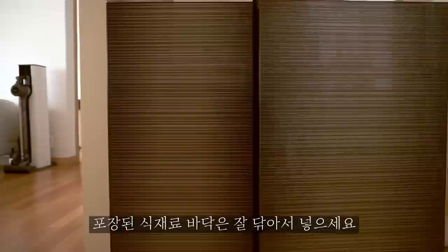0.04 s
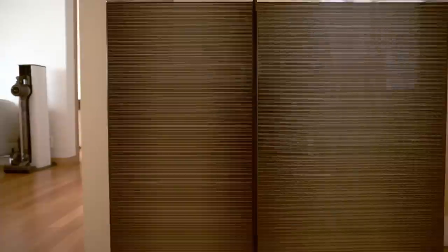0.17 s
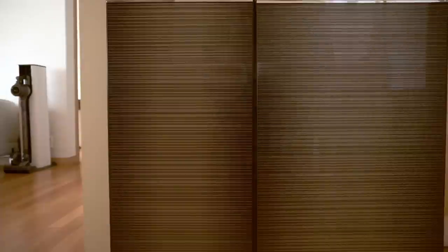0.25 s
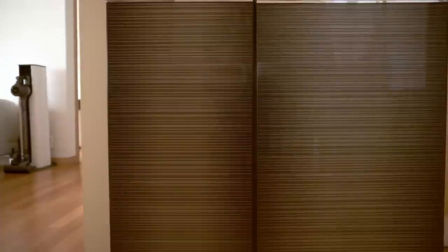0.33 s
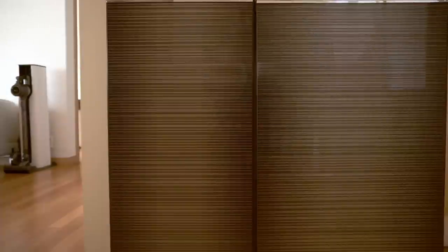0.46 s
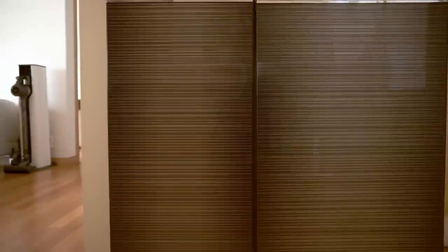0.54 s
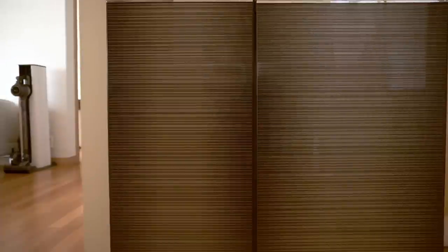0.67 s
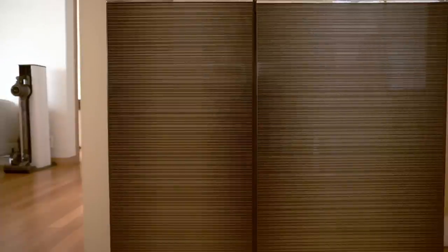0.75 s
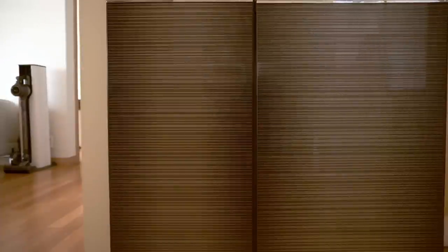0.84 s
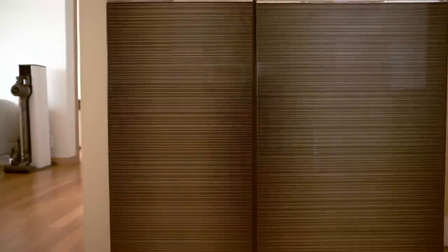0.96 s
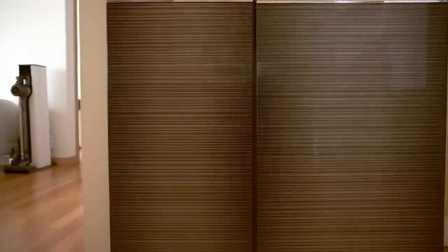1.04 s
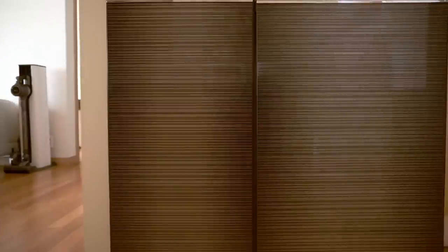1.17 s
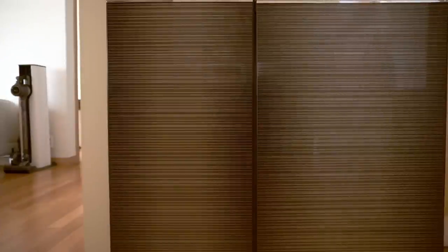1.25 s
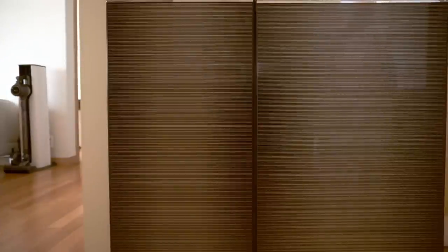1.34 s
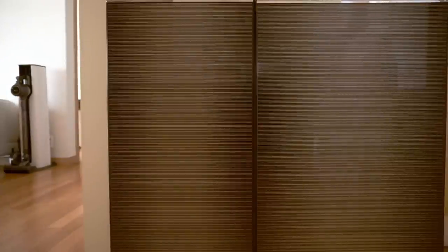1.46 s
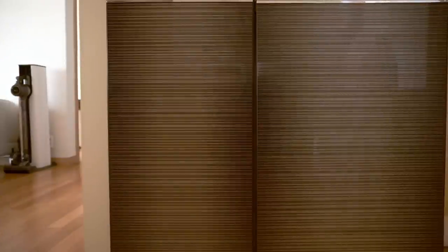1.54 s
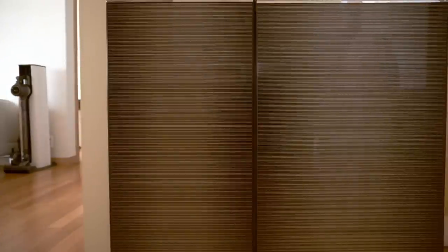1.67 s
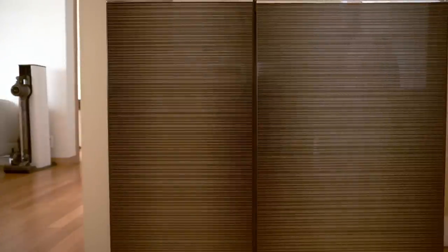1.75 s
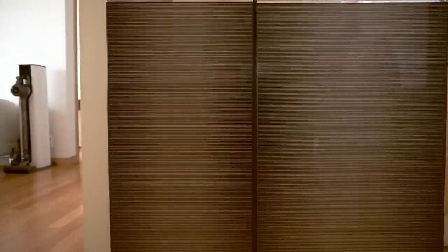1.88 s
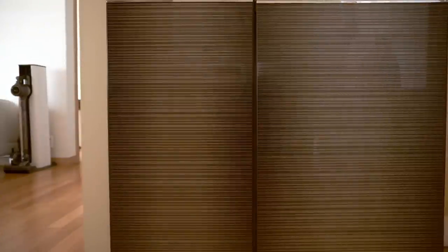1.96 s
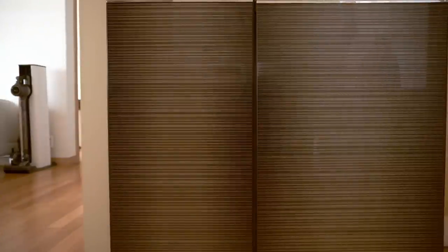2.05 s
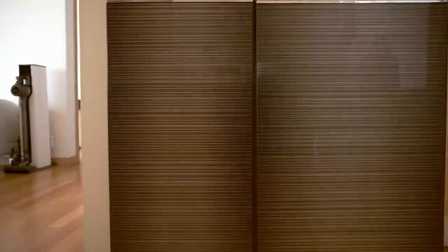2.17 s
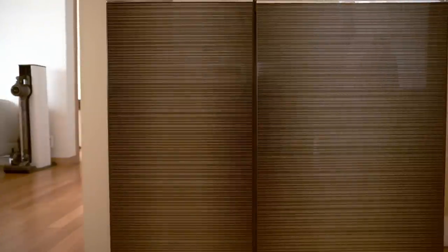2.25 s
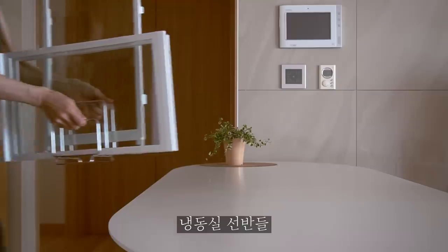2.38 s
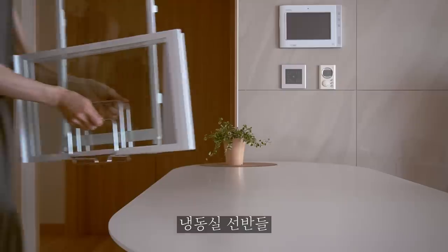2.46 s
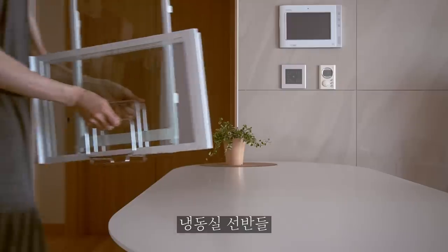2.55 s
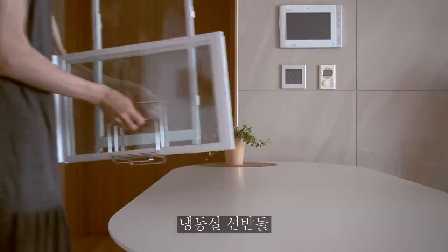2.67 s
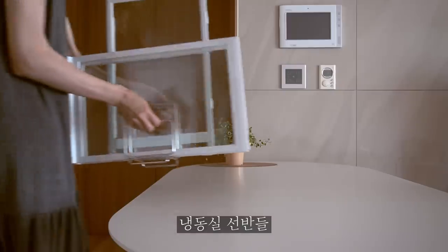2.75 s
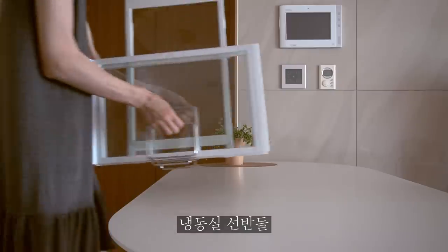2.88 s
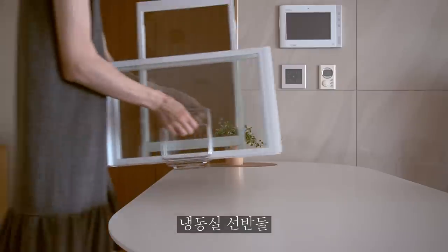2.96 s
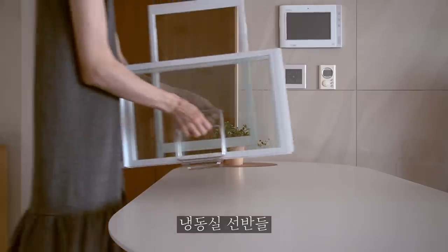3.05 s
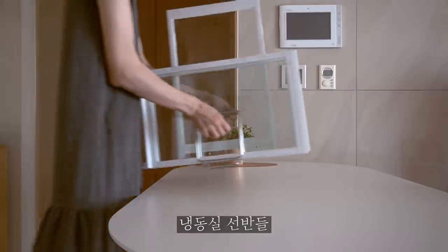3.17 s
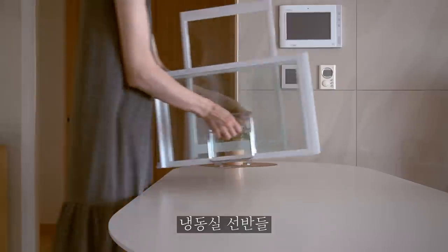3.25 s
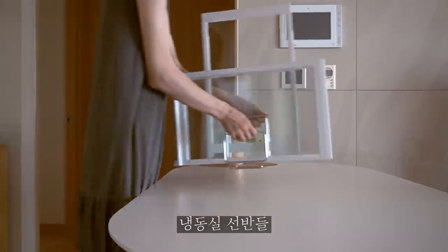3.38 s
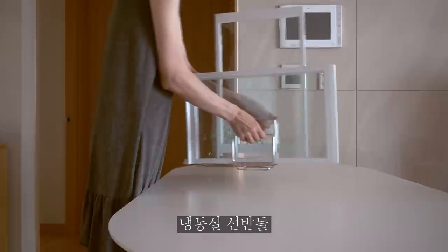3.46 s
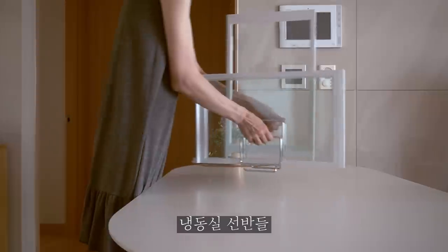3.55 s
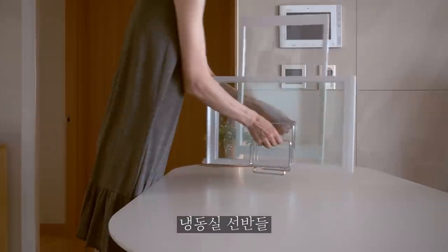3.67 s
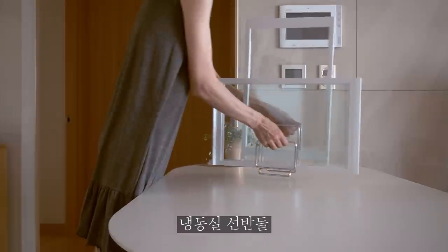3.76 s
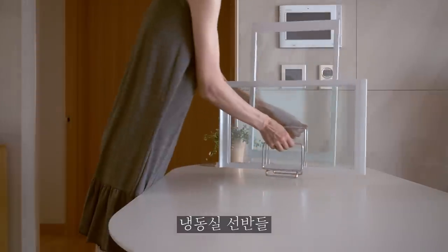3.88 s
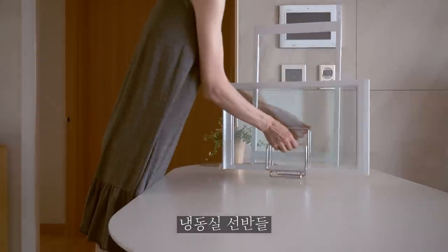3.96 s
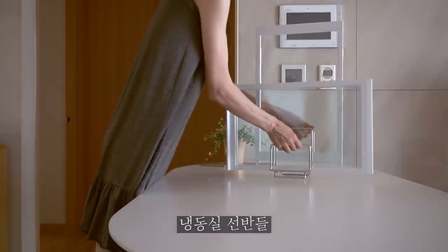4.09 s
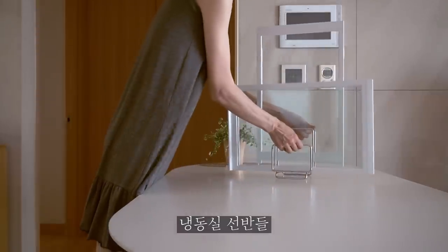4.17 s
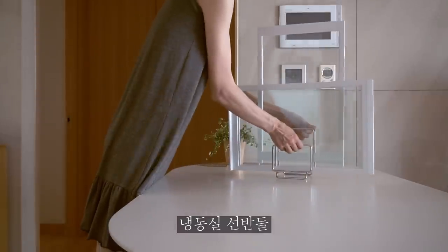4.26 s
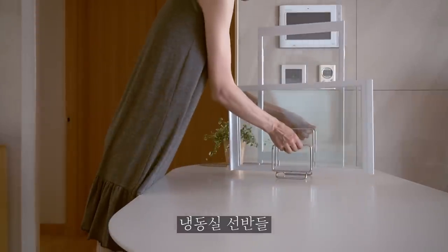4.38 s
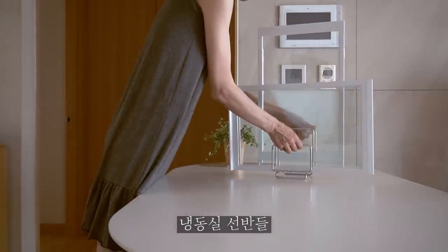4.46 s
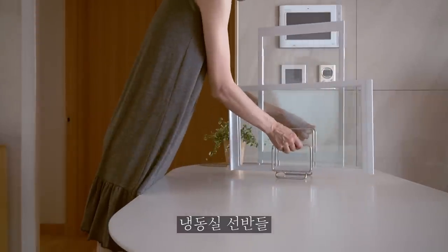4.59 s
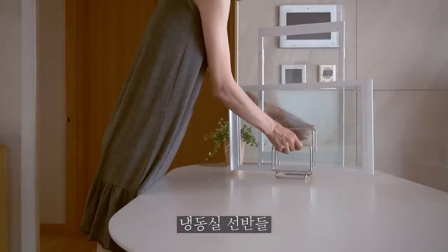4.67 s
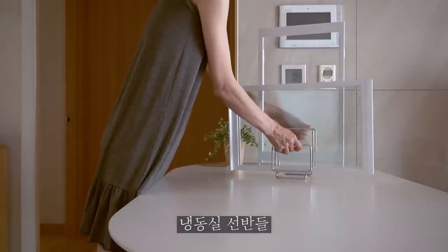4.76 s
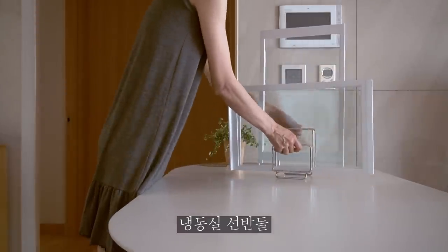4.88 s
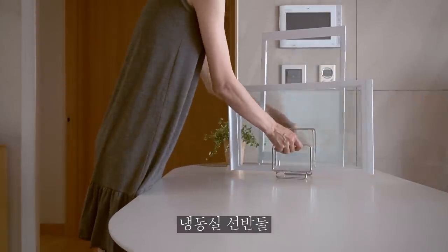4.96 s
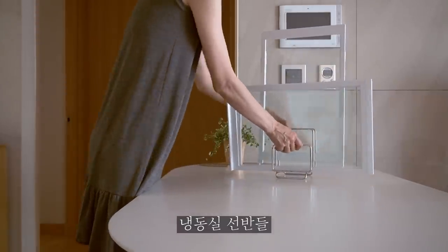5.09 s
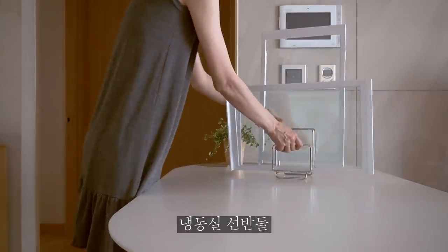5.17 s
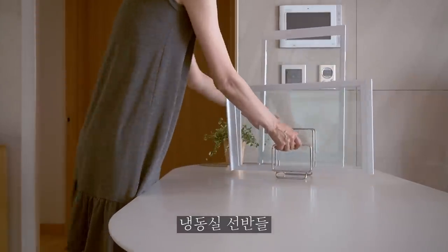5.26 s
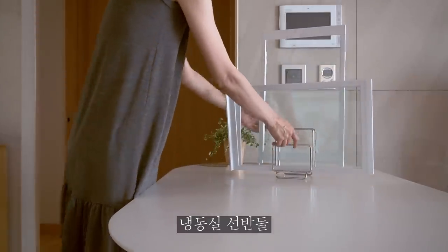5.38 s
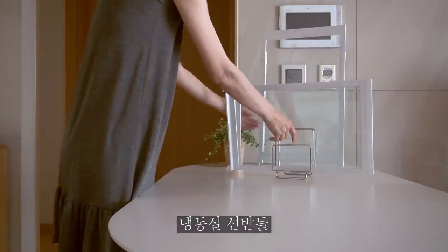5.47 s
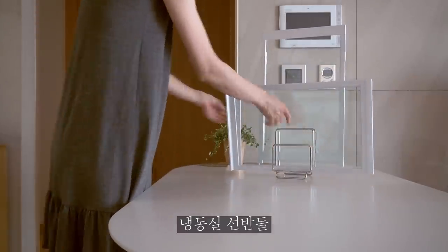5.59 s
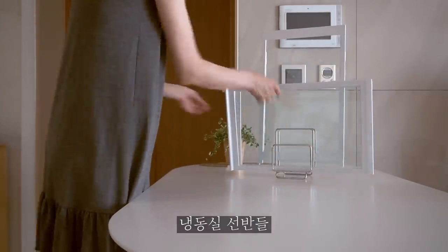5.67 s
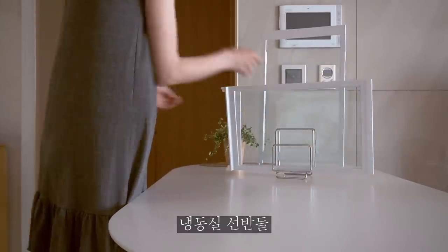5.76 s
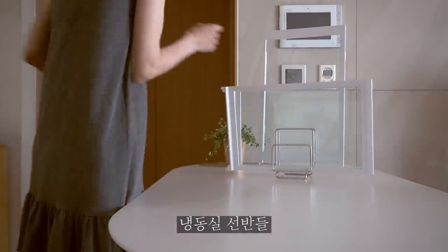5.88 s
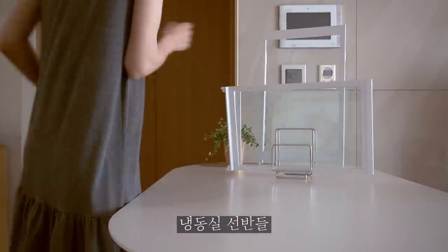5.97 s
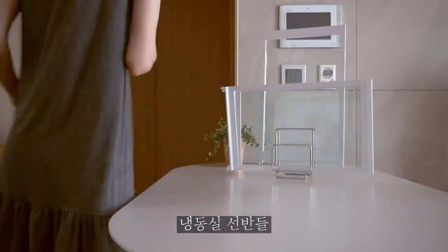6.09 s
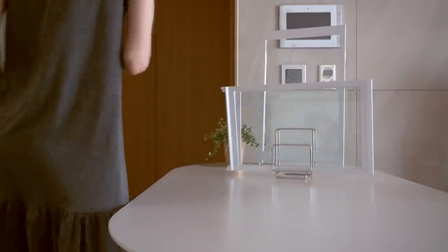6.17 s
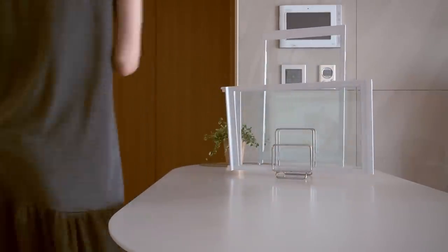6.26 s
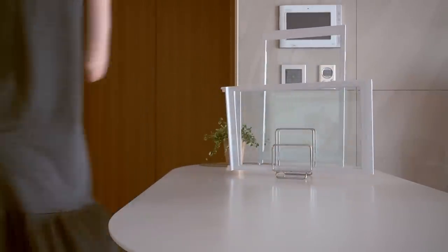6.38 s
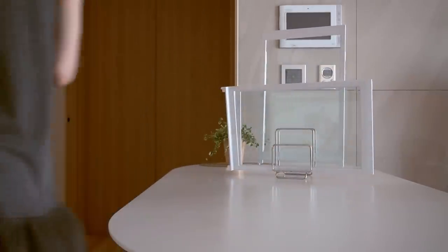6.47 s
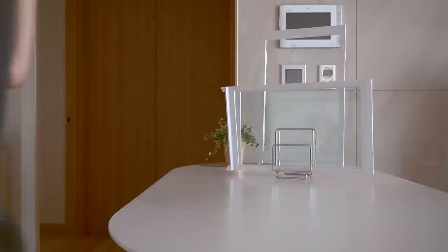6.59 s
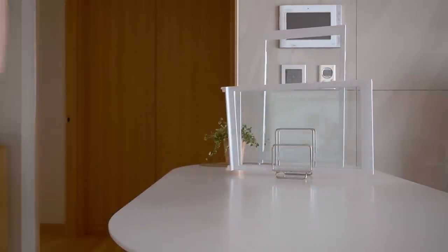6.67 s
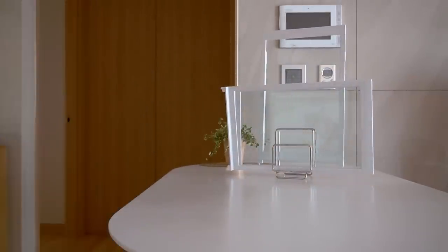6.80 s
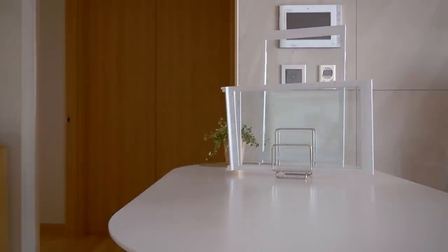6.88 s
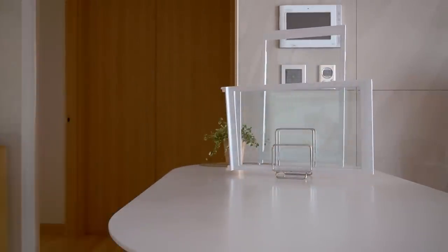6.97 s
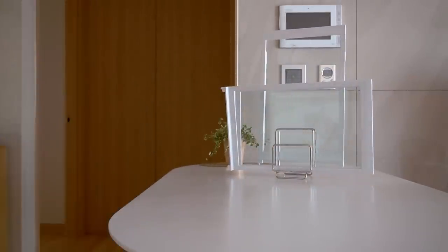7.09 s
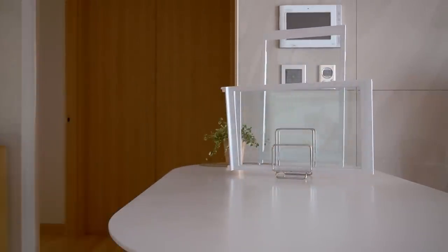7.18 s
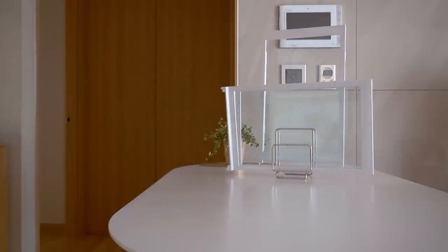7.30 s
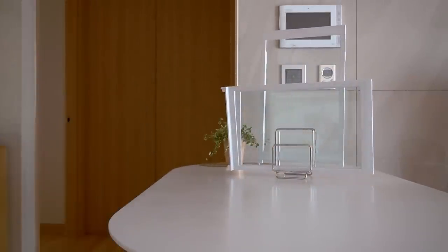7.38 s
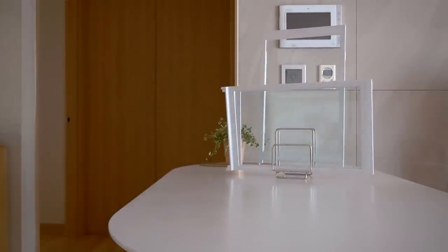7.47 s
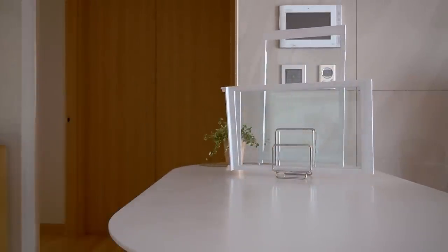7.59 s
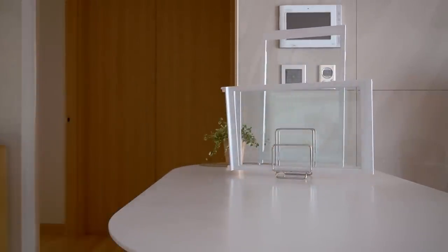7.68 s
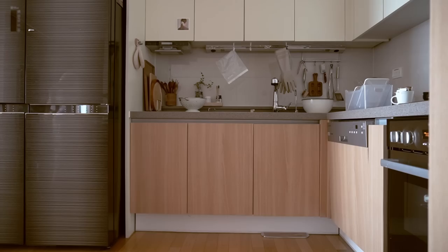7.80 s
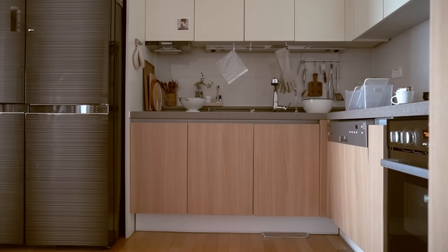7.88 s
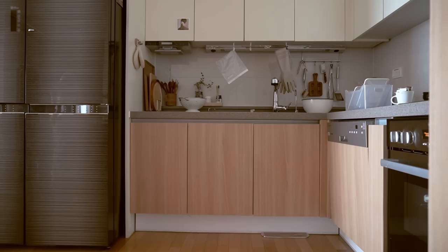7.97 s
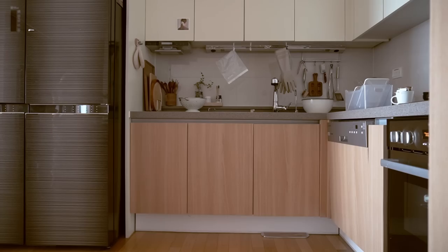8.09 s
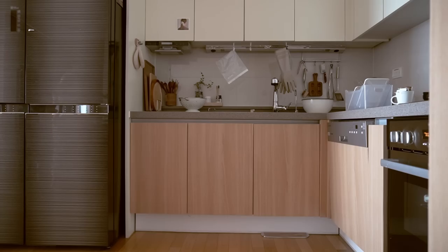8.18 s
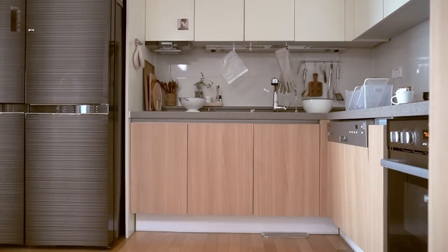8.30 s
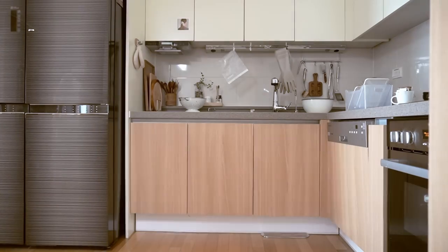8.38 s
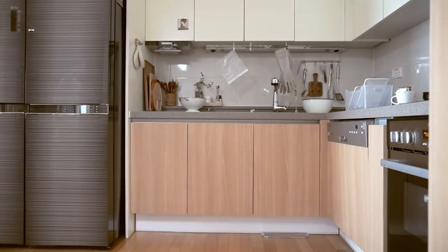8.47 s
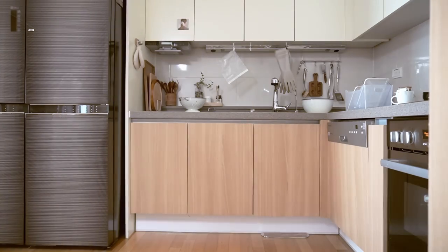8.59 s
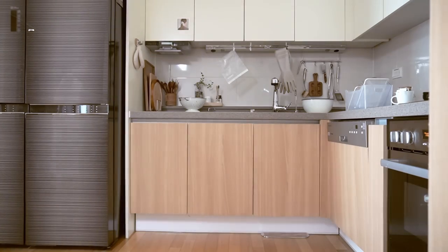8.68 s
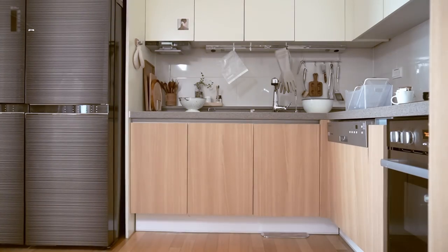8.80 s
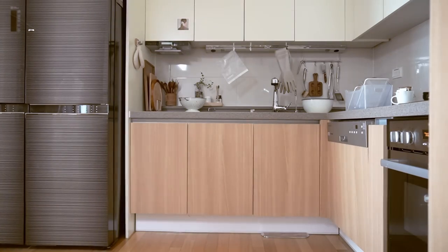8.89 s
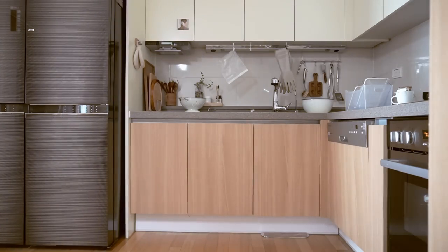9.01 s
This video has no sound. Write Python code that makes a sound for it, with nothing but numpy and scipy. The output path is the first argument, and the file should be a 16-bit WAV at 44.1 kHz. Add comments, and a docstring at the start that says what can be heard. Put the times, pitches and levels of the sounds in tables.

```python
"""A refrigerator door swings shut: a draught, a light touch, then a thud that shakes the cabinet.
Its plastic-framed shelves and a rack tick together as they are carried, knock edge first on a table
and are let go with a clatter. Cloth brushes, soft steps leave; something scrapes, then clacks across
the kitchen. Each blow is a click and rattle, echoed by hard walls and filtered by the object's modes.
Compressor hum, fan whir and air lie under it all, heard by the fridge, at the table, in the kitchen."""
import sys
import numpy as np
from scipy import signal
from scipy.fft import rfft, irfft
from scipy.io import wavfile
from scipy.ndimage import uniform_filter1d

SR = 44100
rng = np.random.default_rng(int(sys.argv[2]) if len(sys.argv) > 2 else 0)


def waveform_to_disk(signal):
    """Save audio, clipped to [-1, 1], as 16-bit WAV at the path in sys.argv[1]."""
    frames = np.transpose(np.atleast_2d(signal))
    scaled = np.clip(frames, -1, 1) * 32767
    samples = np.round(scaled).astype(np.int16)
    wavfile.write(sys.argv[1], SR, samples)


N = 398663
TIME_S = np.arange(N) / SR
AT_TABLE_S, IN_KITCHEN_S = 2.33, 7.79
PLACE = np.digitize(TIME_S, [AT_TABLE_S, IN_KITCHEN_S])  # 0 fridge, 1 table, 2 kitchen

# Blows. Each row: start in seconds, level of the first 10 ms in dB, brightness in dB per octave.
FOOTFALLS = [(7.128, -39.5, -2), (7.290, -42.5, -8), (7.700, -49, -2)]
FAR_CLACKS = [(8.3231, -22.5, 0), (8.3340, -22.5, 0)]
PLASTIC_TICKS = [(1.2931, -45, -1.5), (2.3776, -42.5, -10), (2.4375, -50, -7), (2.4609, -49, -3),
                 (2.6111, -43.5, -2), (2.7180, -40.5, -7), (2.7597, -49.5, 0.5), (2.7927, -42.5, -6),
                 (2.8296, -50.5, -3), (2.8700, -51, -1), (3.2067, -52, 2), (3.5444, -48.5, -5.5),
                 (3.9282, -51, 0), (4.6201, -43, -8.5), (4.7054, -45, -7), (4.7304, -45, -8),
                 (7.0570, -48.5, -3)]
EDGE_KNOCKS = [(4.0160, -17.5, -2.4), (4.1454, -25, -2), (4.2349, -33, 0), (4.2490, -17.7, -0.7),
               (4.3245, -31, 0)]
SHELF_CLATTERS = [(4.9432, -19, -1.3), (4.9650, -21, -1), (4.9861, -15, -2.1), (5.0040, -22, 1.4),
                  (5.0088, -23.5, 1.5), (5.1838, -15, -1), (5.2462, -21, -1.5)]
DOOR_TOUCH = [(0.0475, -30.5, -1.5)]
DOOR_HITS = [(0.2750, -13.5, 1.2), (0.2785, -16.5, 3.5), (0.2800, -21, 6), (0.4155, -40.5, 6)]

# Spectra of each object's dense, short-lived modes. Each row: frequency in Hz, relative level in dB.
FLOOR_BODY = [(18, -28), (36, 1), (80, -9.5), (160, -9.5), (300, -24), (900, -29), (4000, -53)]
CLACK_BODY = [(120, -52), (350, -21), (550, -7), (1300, -12), (1750, -3.5), (2250, -12.5), (4100, -9),
              (5000, -19.5), (6000, -14), (6800, -17), (7800, -14.5), (10500, -23.5), (15500, -34)]
TICK_BODY = [(150, -11), (500, 0.5), (1100, 8.5), (2300, 2.5), (3200, -1), (4000, 0.5), (5500, -15.5),
             (9000, -14.5), (15000, -63)]
EDGE_BODY = [(60, -21), (150, -13), (240, -11), (450, -8.5), (750, -4), (930, -4), (1150, 3.5), (1650, -1),
             (2350, -7.5), (3200, -19.5), (4100, -14.5), (5200, -30.5), (8000, -36.5), (15000, -60)]
SHELF_BODY = [(70, -26), (130, -4.5), (300, -19), (550, -7), (820, -1), (960, -8.5), (1400, -1.5),
              (2800, -6), (4000, -4), (5000, -14.5), (8000, -18.5), (11000, -25), (15500, -41)]
TOUCH_BODY = [(60, -55), (200, -13), (320, 2), (520, 3), (800, -7), (1200, -10.5), (2400, -7),
              (4300, -15.5), (6500, -29), (15000, -43)]
DOOR_BODY = [(25, -25), (80, -2), (130, -1), (175, -2), (280, 4.5), (850, -2.5), (1150, -7), (2200, -9),
             (3200, -22), (3900, -17.5), (5200, -32), (8800, -38.5), (15000, -52.5)]

# Resonances on top of those spectra. Each row: centre in Hz, width in Hz, height in dB.
CLACK_MODES = [(520, 90, 2.3), (1616, 70, 5), (1771, 49, 5), (1870, 140, 5.4), (2860, 70, 5.4),
               (3970, 62, 4.5), (5800, 220, 5.2), (7200, 90, 6), (7700, 140, 4.2)]
EDGE_MODES = [(120, 4.7, 6.5), (152, 14, 6.8), (180, 18, 12), (327.5, 18, 7.6), (624, 22, 11.4),
              (796, 86, 9.6), (1063, 31, 8), (1315, 52, 4.5), (1960, 29, 2.6), (2163, 120, 10),
              (2950, 70, 7.9), (3035, 71, 10), (3640, 39, 14.7), (3850, 150, 5.7), (5600, 46, 16)]
SHELF_MODES = [(119.5, 23, 6.3), (184, 21, 7.3), (510, 120, 9.6), (644, 27, 4.1), (664, 22, 3.4),
               (770, 34, 7.6), (1060, 76, 8.4), (1444, 52, 5.4), (1644, 48, 5.1), (2100, 37, 4),
               (2556, 15, 4.3), (3550, 51, 4.9), (3700, 90, 3.3), (3840, 60, 6.3), (4450, 23, 6.8),
               (6500, 77, 5.8), (7910, 60, 4)]
TOUCH_MODES = [(346, 65, 5.6), (2606, 100, 13), (2700, 100, 5.2)]
DOOR_MODES = [(221, 31, 2), (308, 17, -1), (345, 17, 2), (510, 35, 1.5), (820, 48, 1.5), (940, 63, 6.5),
              (2330, 170, 3), (3880, 290, -0.5)]

# Air at each place, and the door's draught. Each row: frequency in Hz, relative level in dB.
FRIDGE_AIR = [(25, 3), (100, -3), (160, -16), (300, -8), (750, -17), (1500, -20.5), (2500, -28.5),
              (4300, -30), (6000, -38.5), (15000, -47.5)]
TABLE_AIR = [(25, 0), (70, -5), (130, -7), (260, -9), (400, -10.5), (520, -15.5), (780, -18.5), (1500, -22),
             (2600, -31.5), (4000, -31.5), (5000, -37), (15000, -44)]
KITCHEN_AIR = [(25, 0.5), (110, -15), (300, -12.5), (1100, -21), (2000, -29.5), (3200, -37), (4000, -38),
               (5000, -44), (15000, -53.5)]
DRAUGHT_AIR = [(25, 7), (90, -2.5), (170, -11), (400, -7), (900, -17), (2800, -27.5), (6000, -43.5),
               (15000, -62)]

# Wall echoes. Each row: frequency in Hz, T60 in seconds, relative level in dB.
ROOM_DECAY = [(50, 0.61, 5), (255, 0.37, 6), (700, 0.54, 0.5), (4300, 0.59, 0.5), (8000, 0.55, 1.5),
              (14100, 0.59, -8.5)]
# Compressor hum. Each row: harmonic number, relative level in dB.
HUM_HARMONICS = [(1, 0.5), (2, -32), (3, -19), (4, -11.5), (8, -12.5)]
# Fan and squeak resonances. Each row: centre in Hz, width in octaves, relative level in dB.
FAN_BANDS = [(540, 0.092, -3.5), (582.8, 0.046, -1), (661, 0.025, -10.5)]
SQUEAK_BANDS = [(1020, 0.052, -3.5), (1198, 0.032, 0), (1329, 0.023, -4.5), (3850, 0.22, -20)]
# Brushes of cloth. Each row: peak time in seconds, level in dB, centre in Hz, width in octaves.
CLOTH_SWISHES = [(3.025, -57, 6850, 0.76), (3.60, -64, 2600, 0.59), (6.07, -74, 2660, 0.2),
                 (6.53, -66.5, 6500, 0.5), (6.575, -59.5, 3120, 0.38)]
# Table top boom. Each row: frequency in Hz, level relative to the blow in dB, T60 in seconds.
TABLE_BOOM = [(119, -28, 0.43), (153.5, -8.5, 0.16), (170.7, -9, 0.17)]
# Cabinet shudder. Each row: frequency in Hz, level in dB, T60 in seconds.
CABINET_SHUDDER = [(31.6, -24.5, 1), (50.3, -21.5, 0.58), (74.9, -23.5, 0.97), (88.3, -24, 0.4)]


def amp(db):
    """Decibels to gain."""
    return 10 ** (np.asarray(db) / 20)


def unit_rms(x):
    """Scales to an rms of one."""
    return x / np.sqrt(np.mean(x ** 2) + 1e-20)


def curve_at(points, hz):
    """Interpolates a table on a log-frequency axis."""
    points_hz, values = np.transpose(points)
    return np.interp(np.log(hz + 1), np.log(points_hz + 1), values)


def add(mix, start_s, sound):
    """Adds a sound into the mix in place."""
    part = mix[max(round(start_s * SR), 0):][:len(sound)]
    part += sound[:len(part)]


def noise(shape_db):
    """Unit-rms noise with the spectrum shape_db(hz)."""
    gain = amp(shape_db(np.fft.rfftfreq(N, 1 / SR)))
    return unit_rms(irfft(rfft(rng.standard_normal(N)) * gain, N))


def band_noise(centre_hz, octaves):
    """Unit-rms noise in a bell-shaped band."""
    return noise(lambda hz: -10 / np.log(10) * (np.log2((hz + 1) / centre_hz) / octaves) ** 2)


def resonant_noise(bands):
    """Unit-rms sum of noise bands."""
    return unit_rms(sum(amp(db) * band_noise(hz, octaves) for hz, octaves, db in bands))


def causal_filter(x, shape_db):
    """Minimum-phase filter: nothing sounds before the blow."""
    size = 2 * len(x)
    log_gain = np.log(amp(shape_db(abs(np.fft.fftfreq(size, 1 / SR)))))
    response = np.exp(np.conj(signal.hilbert(log_gain)))
    return irfft(rfft(x, size) * response[:size // 2 + 1])[:len(x)]


def wall_echoes(build_s, size=32768):
    """Dense unit-energy echoes that build up, then decay at each band's own rate."""
    hz, t, spectra = signal.stft(rng.choice([-1., 1.], size), SR, nperseg=256)
    t60_s, db = (curve_at(np.array(ROOM_DECAY)[:, [0, k]], hz)[:, None] for k in (1, 2))
    tail = signal.istft(spectra * amp(db - 60 * t / t60_s), SR, nperseg=256)[1][:size]
    tail *= 1 - np.exp(-(np.arange(size) / SR / build_s) ** 2)
    return tail / np.linalg.norm(tail)


def struck(blows, body, modes, rattle_t60_s, rattle_db, wet_db, build_s, size=32768):
    """Click, rattle and echoes ring in the object's modes; each blow has its own level and brightness."""
    def colour_db(hz, tilt_db):
        peaks_db = sum(db / (1 + (2 * (hz - mode_hz) / width_hz) ** 2) for mode_hz, width_hz, db in modes)
        return curve_at(body, hz) + peaks_db + tilt_db * np.log2(1 + hz / 700)

    out, t = np.zeros(N), np.arange(size) / SR
    for start_s, level_db, tilt_db in blows:
        rattle = rng.choice([-1., 1.], size) * amp(-60 * t / rattle_t60_s)
        contact = signal.unit_impulse(size) + amp(rattle_db) * rattle / np.linalg.norm(rattle)
        arrivals = contact / np.linalg.norm(contact) + amp(wet_db) * wall_echoes(build_s)
        sound = causal_filter(arrivals, lambda hz: colour_db(hz, tilt_db))
        onset_rms = np.sqrt(np.mean(sound[:SR // 100] ** 2))
        add(out, start_s, amp(level_db) * sound / onset_rms)
    return out


def ringing(modes):
    """One second of decaying sines, started together by a blow."""
    t = np.arange(SR) / SR
    return sum(amp(db - 60 * t / t60_s) * np.sin(2 * np.pi * hz * t) for hz, db, t60_s in modes)


def stroke(peak_s, rise_s, fall_s):
    """Envelope of a rub: Gaussian rise, exponential fall."""
    t = TIME_S - peak_s
    return np.exp(-(np.minimum(t, 0) / rise_s) ** 2 - np.maximum(t, 0) / fall_s)


def rubbed(friction, grain_db=2.5, grain_hz=53, wet_db=-3.5):
    """Gives friction its uneven grain and its echoes."""
    grainy = friction * amp(grain_db * band_noise(grain_hz, octaves=1))
    return grainy + amp(wet_db) * signal.fftconvolve(grainy, wall_echoes(build_s=0.0026))[:N]


def by_place(fridge, table, kitchen):
    """Holds one value per listening place, with short ramps between."""
    return uniform_filter1d(np.array([fridge, table, kitchen], float)[PLACE], size=1500)


def room_air(fridge_db=-45.5, table_db=-50, kitchen_db=-44):
    """The soft rush of each place in turn, crossfaded at equal power."""
    beds = [amp(fridge_db) * noise(lambda hz: curve_at(FRIDGE_AIR, hz)),
            amp(table_db) * noise(lambda hz: curve_at(TABLE_AIR, hz)),
            amp(kitchen_db) * noise(lambda hz: curve_at(KITCHEN_AIR, hz))]
    return sum(bed * np.sqrt(abs(by_place(*weights))) for bed, weights in zip(beds, np.eye(3)))


def refrigerator(hum_hz=59.36, waver_hz=0.7, whine_hz=4080):
    """The compressor's wavering hum, the fan's narrow whir and a thin whine."""
    cycles = np.cumsum(hum_hz + waver_hz * band_noise(3.42, octaves=0.668)) / SR
    hum = unit_rms(sum(amp(db) * np.sin(2 * np.pi * round(k) * cycles) for k, db in HUM_HARMONICS))
    fan = amp(by_place(-51, -51.5, -70)) * resonant_noise(FAN_BANDS)
    hum_db = by_place(-46, -48.5, -51.5) + 1.4 * band_noise(1.0, octaves=0.64)
    whine = amp(by_place(-73.5, -81, -75)) * band_noise(whine_hz, octaves=0.013)
    return amp(hum_db) * hum + fan + whine


def cloth(hiss_db=-4.5, hiss_lead_s=0.047, hiss_ratio=1.5):
    """Cloth brushes: a thin, high hiss leads each swish."""
    friction = np.zeros(N)
    for peak_s, db, centre_hz, octaves in CLOTH_SWISHES:
        hiss = band_noise(centre_hz * hiss_ratio, octaves=0.33)
        hiss *= stroke(peak_s - hiss_lead_s, rise_s=0.013, fall_s=0.023)
        swish = stroke(peak_s, rise_s=0.05, fall_s=0.064) * band_noise(centre_hz, octaves)
        friction += amp(db) * (swish + amp(hiss_db) * hiss)
    return rubbed(friction)


def footsteps():
    """Heels thud softly on the wooden floor."""
    return struck(FOOTFALLS, FLOOR_BODY, [], rattle_t60_s=0.27, rattle_db=-4.5, wet_db=-0.5, build_s=0.023)


def scrape(catch_s=7.954, catch_db=-48.5, tilt_db=2.8, squeak_db=-39.5, rub_db=-43, rub_hz=800):
    """Something catches with a tick, then slides briefly with a broad rub and a narrow squeak."""
    catch = struck([(catch_s, catch_db, tilt_db)], TICK_BODY, [],
                   rattle_t60_s=0.08, rattle_db=12, wet_db=3.5, build_s=0.004)
    squeak = amp(squeak_db) * resonant_noise(SQUEAK_BANDS)
    rub = amp(rub_db) * band_noise(rub_hz, octaves=0.77)
    slide = stroke(peak_s=8.043, rise_s=0.067, fall_s=0.023)
    return catch + rubbed(slide * (squeak + rub))


def far_clack():
    """A hard, echoing clack across the kitchen."""
    return struck(FAR_CLACKS, CLACK_BODY, CLACK_MODES,
                  rattle_t60_s=0.19, rattle_db=15, wet_db=-3, build_s=0.0031)


def jostles(count=7, from_s=2.36, to_s=2.5, level_db=-55, spread_db=5.5, tilt_db=-1.6):
    """Rows of faint, uneven blows as the carried frames shift against each other."""
    jitter, strength = rng.random((count, 2)).T
    starts_s = from_s + (to_s - from_s) * (np.arange(count) + jitter) / count
    levels_db = level_db + spread_db * (2 * strength - 1)
    return [(start_s, db, tilt_db) for start_s, db in zip(starts_s, levels_db)]


def shelves():
    """The frames tick in the hands, knock edge first on the booming table, then clatter together."""
    ticks = struck(PLASTIC_TICKS + jostles(), TICK_BODY, [],
                   rattle_t60_s=0.038, rattle_db=6, wet_db=-4, build_s=0.0036)
    knocks = struck(EDGE_KNOCKS, EDGE_BODY, EDGE_MODES,
                    rattle_t60_s=0.049, rattle_db=16, wet_db=-7, build_s=0.013)
    for start_s, db, _ in EDGE_KNOCKS:
        add(knocks, start_s, amp(db) * ringing(TABLE_BOOM))
    clatter = struck(SHELF_CLATTERS, SHELF_BODY, SHELF_MODES,
                     rattle_t60_s=0.051, rattle_db=7, wet_db=-3.5, build_s=0.0077)
    return ticks + knocks + clatter


def door(shut_s=0.2752, draught_db=-37.5, squeeze_db=-28, squeeze_s=0.0092, pulse_db=-6, pulse_s=0.0075):
    """The door drags air, touches, then hits the cabinet, which gives one air pulse and shudders."""
    squeeze = amp(squeeze_db) * np.exp(-abs(TIME_S - shut_s) / squeeze_s)  # swells as the gap closes
    airflow = (amp(draught_db) + squeeze) * (TIME_S < shut_s)
    draught = airflow * noise(lambda hz: curve_at(DRAUGHT_AIR, hz))
    touch = struck(DOOR_TOUCH, TOUCH_BODY, TOUCH_MODES,
                   rattle_t60_s=0.04, rattle_db=17, wet_db=-0.5, build_s=0.0029)
    thud = struck(DOOR_HITS, DOOR_BODY, DOOR_MODES,
                  rattle_t60_s=0.036, rattle_db=1.5, wet_db=-3.5, build_s=0.0029)
    age = np.arange(SR) / SR / pulse_s
    pulse = amp(pulse_db) * (1 - age) * np.exp(-age) * (1 - np.exp(-20 * age))
    out = draught + touch + thud
    add(out, shut_s, -pulse - ringing(CABINET_SHUDDER))
    return out


def scene():
    """All sources in one channel."""
    events = door() + shelves() + scrape() + far_clack() + footsteps() + cloth()
    return (events + refrigerator() + room_air())[None]


def record(dry):
    """Clips at full scale, which the door just exceeds, then low-passes."""
    cutoff_hz = 15850
    lowpass = signal.firwin(511, cutoff_hz, window=("kaiser", 9), fs=SR)
    return signal.oaconvolve(np.clip(dry, -1, 1), lowpass[None], "same")


dry = scene()
out = record(dry)
waveform_to_disk(out)
```